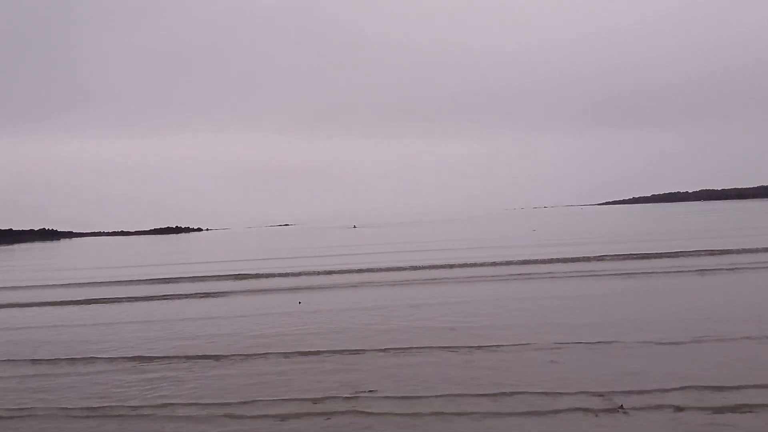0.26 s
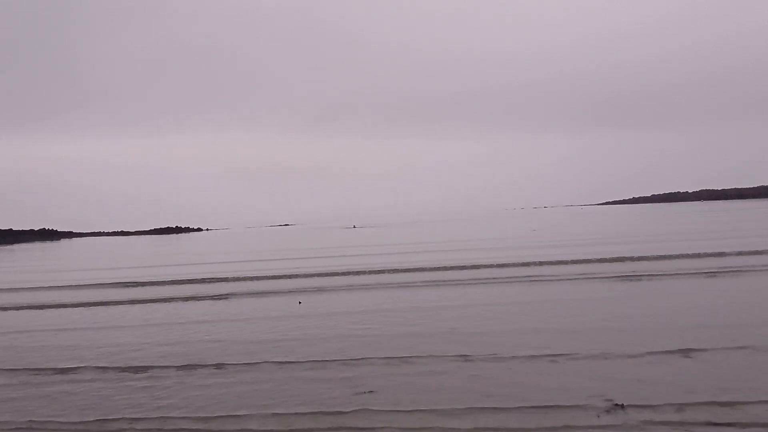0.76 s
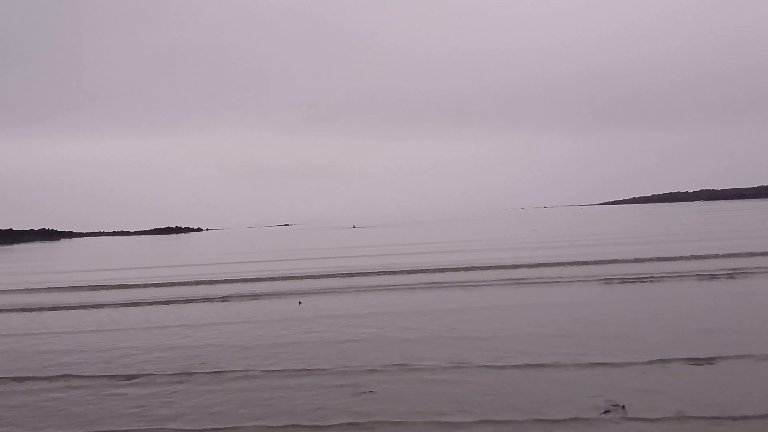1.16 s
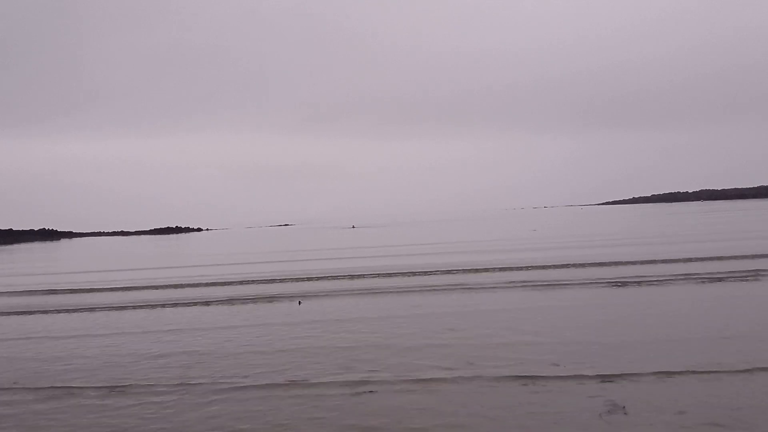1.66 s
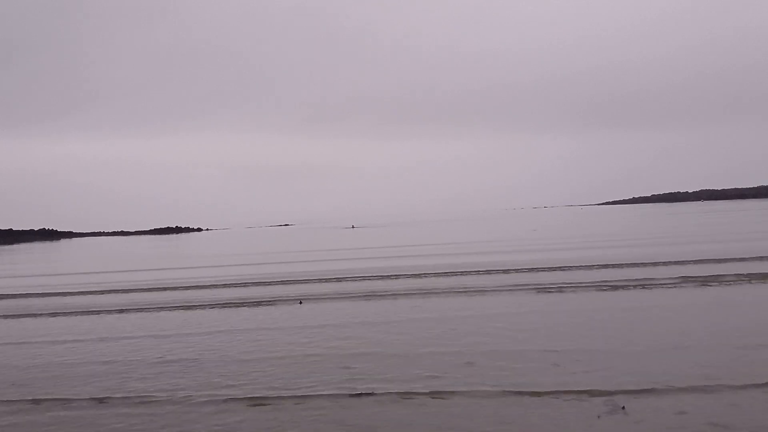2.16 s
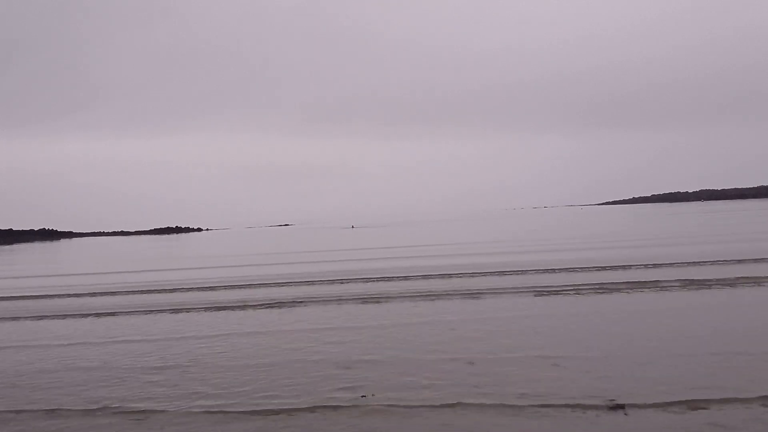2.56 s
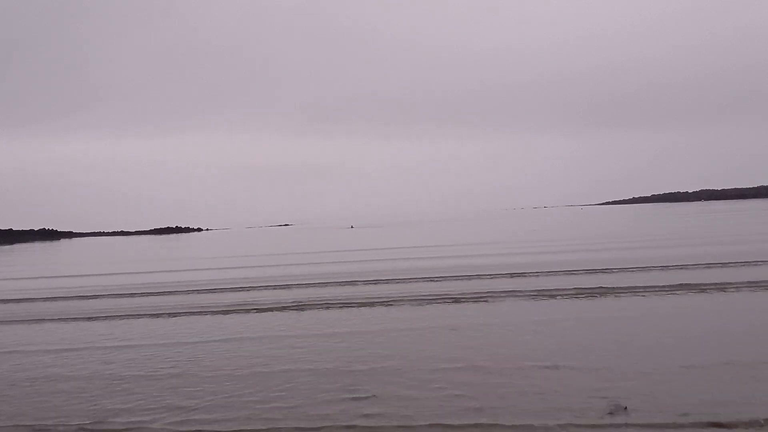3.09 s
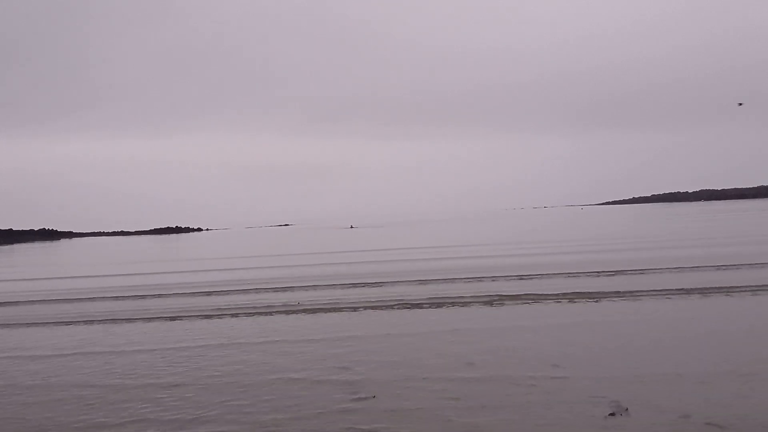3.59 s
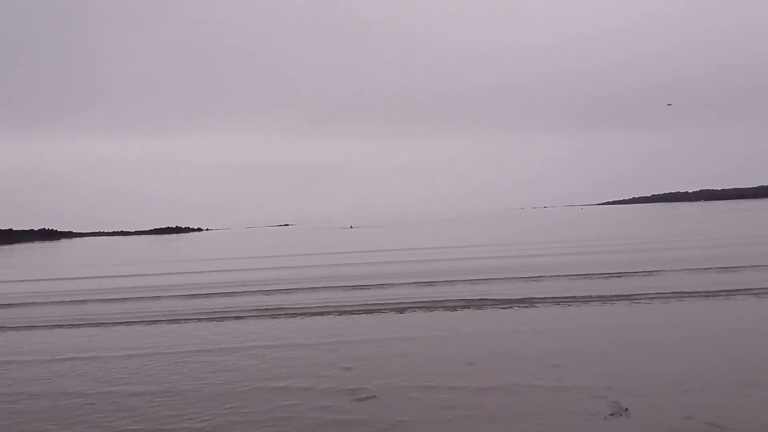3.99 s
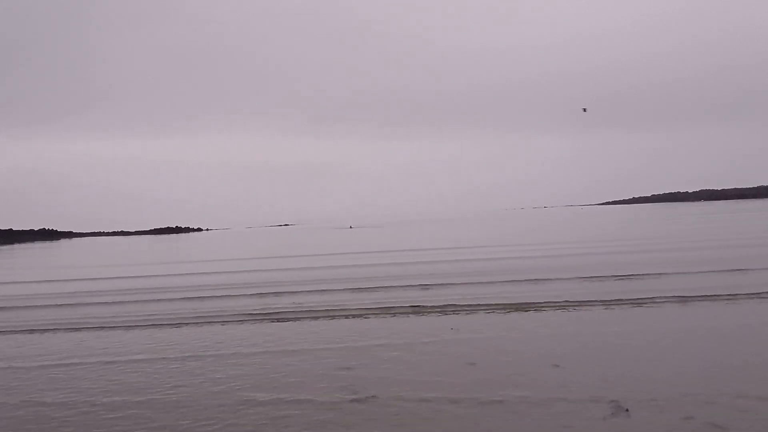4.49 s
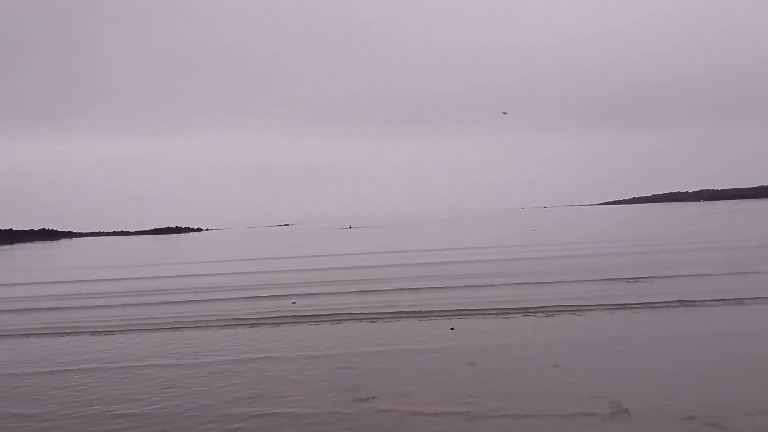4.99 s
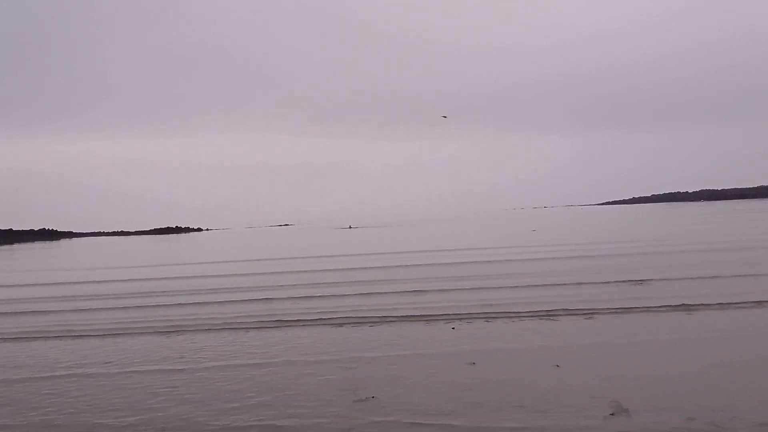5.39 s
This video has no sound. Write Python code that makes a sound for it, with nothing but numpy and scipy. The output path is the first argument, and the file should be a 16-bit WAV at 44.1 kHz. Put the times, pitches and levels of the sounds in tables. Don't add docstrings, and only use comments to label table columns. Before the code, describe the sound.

Close, fizzing shore wash fades into trickles and tiny bubble pops, over a low far-off traffic rumble and a few short bird chirps.

```python
import sys
import numpy as np
from scipy import signal
from scipy.io import wavfile
from scipy.ndimage import uniform_filter1d

SR = 44100
rng = np.random.default_rng(int(sys.argv[2]) if len(sys.argv) > 2 else 0)


def to_wav(s):
    ch = np.atleast_2d(s).T
    pcm = np.round(np.clip(ch, -1, 1) * 32767)
    wavfile.write(sys.argv[1], SR, pcm.astype(np.int16))


def invert_db(x):
    u = np.asarray(x, float) / 20
    return 10 ** u


N = 249165
T = np.arange(N) / SR
SPACING_M, SOUND_SPEED = 0.18, 343


def evened(x):
    return x / np.sqrt(np.mean(x ** 2) + 1e-20)


def read(points, hz):
    f, value = np.transpose(points)
    return np.interp(np.log(hz + 1), np.log(f + 1), value)


def curves(rows, t):
    s, *columns = np.transpose(rows)
    return [np.interp(t, s, c) for c in columns]


def follow(control_db, base_db, share):
    return invert_db(base_db + share * control_db)


def drift(t, lo_hz, hi_hz):
    total = np.zeros(len(t))
    for f in np.geomspace(lo_hz, hi_hz, num=24):
        total += np.sin(2 * np.pi * (f * t + rng.random())) / np.sqrt(f)
    return evened(total)


def add(mix, s, sound, pan_db, lag=0):
    for ear, side, late in ((0, 0.31, max(lag, 0)), (1, -0.87, max(-lag, 0))):
        part = mix[ear, round(s * SR) + late:][:len(sound)]
        part += invert_db(side * pan_db) * sound[:len(part)]


# f/Hz, left minus right level/dB
EAR_BALANCE = [(60, -1.5), (120, -1.5), (240, -3.5), (480, -3.0), (950, -2.5), (1890, -2.5), (3770, -3.5),
               (7520, -2.5), (15000, -2.5)]


def hiss(colour, size, patchy_db, flicker_db, tilt=0, spread=1):
    hop, hz = size // 4, np.fft.rfftfreq(size, 1 / SR)
    frames = N // hop + 5
    a, b, c, d, patches, flicker = rng.standard_normal((frames, len(hz), 6)).T
    patches = uniform_filter1d(patches, size=size // 100 + 1, axis=0)
    patches = evened(uniform_filter1d(patches, size=2048 // hop + 1, axis=1))
    flicker = evened(uniform_filter1d(flicker, size=size // 8, axis=0))
    same = np.sinc(2 * hz * SPACING_M * spread / SOUND_SPEED)[:, None] * .97
    left = a + 1j * b
    right = same * left + np.sqrt(1 - same ** 2) * (c + 1j * d)
    tilt_db = np.interp(np.arange(frames) * hop, np.arange(N), tilt * np.ones(N))
    slope = np.log2((hz[:, None] + 50) / 1500) * tilt_db
    balance = read(EAR_BALANCE, hz)[:, None] * np.array([.5, -.5])[:, None, None]
    level = read(colour, hz)[:, None] + slope + patchy_db * patches + flicker_db * flicker + balance
    z = np.array([left, right]) * invert_db(level)
    return evened(signal.istft(z, nperseg=size, noverlap=size - hop)[1][:, :N])


def bubble(hz, ring_s, rise, onset=0.086):
    u = np.arange(round(2.1 * ring_s * SR) + 8) / (ring_s * SR)
    tone = np.sin(2 * np.pi * hz * ring_s * (u + rise * u ** 2 / 2))
    return tone * invert_db(-40 * u) * np.minimum(u / onset, 1)


def swarm(lo_hz, hi_hz, cycles, per_s, spread_db, count, wide=1):
    out = np.zeros((2, N))
    for hz, shape, way in zip(np.geomspace(lo_hz, hi_hz, num=count), *rng.random((2, count))):
        strength = invert_db(spread_db * np.minimum(rng.exponential(1, N), 4))
        train = strength * (rng.random(N) < per_s / count / SR)
        ring = bubble(hz, cycles * (0.52 + 1.39 * shape) / hz, .5 * shape)
        lag = round((1 - 2 * wide * way) * SPACING_M / SOUND_SPEED * SR)
        add(out, 0, signal.oaconvolve(train, ring)[:N], -3, lag)
    return evened(out)


# f/Hz, level/dB per Hz
WASH_COLOUR = [(290, -57), (500, -20.5), (652, -10.5), (1110, -3.5), (1500, -2), (2440, -7.5), (3460, -5.5),
               (5160, -14), (6490, -17), (7510, -17), (9000, -38), (11700, -20), (19800, -120)]


def wash(wave_db):
    water = hiss(WASH_COLOUR, size=512, patchy_db=1.45, flicker_db=-0.1, tilt=-2.15)
    bubbles = swarm(1405, 5190, 10.8, 900., 2.3, count=20, wide=0.44)
    return follow(wave_db, -51.5, 1.123) * (water + 0.45 * bubbles)


# f/Hz, level/dB per Hz
FOAM_COLOUR = [(2940, -7.5), (5000, -1.5), (6490, -7.5), (7510, 1), (8230, -1.5), (15100, -1), (15900, -24)]


def foam(wave_db):
    fizz = hiss(FOAM_COLOUR, size=256, patchy_db=1.0, flicker_db=2.5)
    bubbles = swarm(5700, 13800, 1.8, 600., 3.5, count=16, wide=.45)
    return follow(wave_db, -61, 1.3) * (fizz + 0.63 * bubbles)


def plunge(wave_db):
    return follow(wave_db, -56.5, 2.6) * swarm(578, 1020, 10.1, 1100., 0.76, count=14, wide=0.38)


# t/s, peak level/dB
SPURTS = [(.01, -51.5), (.14, -51.5), (.28, -52), (.43, -53), (.48, -56), (.57, -55), (1.98, -60),
          (2.28, -83), (2.985, -57), (3.29, -59), (3.81, -66), (3.96, -62), (4.07, -72), (4.33, -67),
          (4.41, -66), (4.59, -85), (4.97, -63), (5.04, -68)]


def trickle(wave_db):
    rise_s, fall_s = 0.0087, 0.019
    gain = follow(wave_db, -56.5, 3.5)
    gain += invert_db(-70.5) * np.exp(-((T - 4.34) / 0.78) ** 2)
    for s, db in SPURTS:
        gain += invert_db(db) * np.exp(-abs(T - s) / np.where(T < s, rise_s, fall_s))
    return gain * swarm(968, 2118, 15., 600., 1.3, count=20, wide=0.4)


# t/s, level/dB below its crest
WAVE_STRENGTH = [(0, -2), (.3, -1), (.55, 0), (1.0, -0.5), (1.35, -2), (1.6, -2.5), (1.8, -3.5),
                 (2.05, -3.5), (2.7, -6), (3.15, -9), (3.7, -12), (4.1, -12.5), (4.5, -13.5), (5.0, -15),
                 (5.25, -18), (5.65, -18.5)]


def wave():
    wave_db = curves(WAVE_STRENGTH, T)[0]
    return wash(wave_db) + foam(wave_db) + plunge(wave_db) + trickle(wave_db)


# t/s, peak level/dB, f/Hz, left minus right level/dB
SLAPS = [(0.002, -41, 1350, -5), (0.141, -35, 1520, -2.5), (0.279, -40, 1540, 1), (0.424, -46, 630, -2.5),
         (0.526, -40, 964, -0.5), (0.569, -36.5, 1370, -4), (0.708, -41, 1540, -3.5), (1.243, -49, 903, 0),
         (1.773, -51, 1362, -10), (2.023, -46, 958, -3.0), (2.573, -52, 1339, -6)]


def slaps():
    out = np.zeros((2, N))
    for s, db, hz, pan_db in SLAPS:
        for pitch in (0.56, 0.95, 1.395):
            add(out, s, invert_db(db - 8.0) * bubble(hz * pitch, .012, 0.097), pan_db, lag=18)
    return out


# t/s, peak level/dB, f/Hz, left minus right level/dB
BUBBLES = [(0.349, -47, 1220, 0), (0.489, -50, 730, -4.5), (2.268, -48.5, 1630, -3.5),
           (2.739, -54, 2027, -7), (2.955, -55, 1490, -5), (2.989, -49.5, 1430, -3), (3.139, -55, 779, -5),
           (3.03, -57, 1410, 0), (3.32, -51.5, 1570, -3), (3.725, -59, 2110, -6), (4.812, -61, 1480, -4),
           (3.49, -59, 1890, -4), (3.685, -59, 2450, -4), (5.158, -62, 1700, -4), (3.378, -57, 1910, -4),
           (3.412, -63, 1440, -3.5), (3.58, -67, 1310, -3.5), (3.69, -59, 1174, -3), (3.782, -55, 1200, -1),
           (3.8645, -65, 1700, -4), (4.6, -59, 1880, -4), (.425, -52, 1150, -2.5), (.444, -43, 1307, -2.5),
           (.478, -48, 1410, -2.5), (.59, -47, 1500, -2.5), (.36, -46, 1500, -2.5), (.95, -48, 835, -2.5),
           (1.01, -47, 822.5, -1), (1.02, -47, 1600, -2.5), (1.435, -49, 1325, -7), (1.46, -48, 1324, -3),
           (1.51, -48.5, 885, -3), (4.042, -52.5, 1440, 1), (4.119, -60, 2000, -6), (4.29, -50.5, 1505, -1),
           (4.834, -57, 1630, -4.5), (5.229, -62, 1410, -4), (5.629, -65, 1640, -11)]


def large_bubbles():
    out = np.zeros((2, N))
    for s, db, hz, pan_db in BUBBLES:
        ring_s = 0.045 * min((hz / 1400) ** -0.62, 1.1)
        add(out, s, invert_db(db - 2) * bubble(hz * .97, ring_s, 0.085), pan_db, lag=5)
    return out


# t/s, level/dB, from f/Hz, to f/Hz, length t/s
GURGLES = [(3.111, -54, 1274, 967, 0.019), (3.275, -56, 1600, 1400, 0.025), (2.9, -54, 1230, 1800, 0.022),
           (3.154, -54, 800, 960, 0.014), (4.7, -59, 1450, 1670, 0.016), (4.386, -64, 820, 810, 0.035),
           (4.44, -66, 1480, 1800, 0.012), (4, -71, 1140, 1290, 0.0091), (3.4, -63, 1240, 1130, 0.017),
           (3.93, -59, 1470, 1350, .03), (4.3247, -50, 2060, 1930, .01), (4.397, -51.5, 1400, 1150, 0.018),
           (4.3972, -53, 1700, 1500, 0.006), (4.422, -52, 1620, 1450, 0.009),
           (4.425, -53, 1000, 1450, 0.022), (4.316, -57, 1000, 1250, 0.018),
           (4.486, -57, 1200, 1230, 0.014), (4.519, -57.5, 1080, 1500, 0.026),
           (3.996, -56, 1500, 1420, .014), (4.585, -63, 1240, 1220, .014), (5.02, -59.5, 1600, 1500, .02),
           (4.947, -61, 570, 580, .02), (4.455, -59, 1400, 1700, .01), (4.3, -59, 1650, 1500, .012),
           (4.335, -60, 1800, 1900, .012), (4.19, -60, 1350, 1500, .014), (3.8, -69, 1200, 1200, 0.059),
           (3.7, -62, 1550, 1300, .025), (5.4, -60, 1300, 1500, 0.0072), (4.435, -63, 890, 880, 0.017),
           (4.164, -64, 1690, 1500, 0.013), (3.6, -65, 1310, 1480, .012), (4.1, -61, 1100, 1070, 0.018),
           (4.53, -54.5, 2930, 2620, 0.007), (3.6, -65, 1600, 1300, 0.012), (4.809, -59.5, 616, 680, .028)]


def gurgles():
    out = np.zeros((2, N))
    for s, db, from_hz, to_hz, length in GURGLES:
        u = np.linspace(0, 1, round(length * SR))
        tone = np.sin(2 * np.pi * np.cumsum(from_hz + (to_hz - from_hz) * u) / SR)
        tone *= 1 + .22 * evened(uniform_filter1d(rng.standard_normal(len(u)), size=90))
        envelope = np.interp(u, [0, .08, .6, 1], [0, 0.38, 0.3, 0.08])
        add(out, s, np.sqrt(2) * invert_db(db) * tone * envelope, -3, lag=4)
    return out


# t/s, peak level/dB, f/Hz, left minus right level/dB
TICKS = [(.131, -58, 4720, 3), (.279, -45, 4730, -2.5), (.328, -46, 4500, -3), (.533, -47, 5470, -3),
         (.709, -53, 4630, -7), (.764, -44, 4990, -6), (.807, -44, 6500, -3), (1.005, -50, 5040, -3.5),
         (1.313, -53, 5000, -7), (1.938, -48, 7400, -8), (2.061, -46, 4800, -1.5), (2.337, -49, 4535, -6),
         (2.6796, -51, 6368, -7), (2.838, -44.5, 3785, -3), (2.944, -45, 3812, -3), (2.957, -49, 3980, -10),
         (3.051, -55, 5670, -5), (3.9005, -56, 5600, -5), (4.11, -55, 3600, -6), (4.325, -50.5, 7400, -6),
         (4.3248, -56, 3900, -7), (4.3249, -59, 5600, -5), (4.38, -57, 4120, -7), (4.503, -60, 8500, -8),
         (4.655, -59, 4270, -14), (4.893, -59, 4620, -6), (4.977, -56.5, 4970, -2.5),
         (5.004, -60, 4360, -3), (5.21, -65, 6600, -11)]


def foam_ticks():
    out = np.zeros((2, N))
    for s, db, hz, pan_db in TICKS:
        add(out, s, invert_db(db + 1.5) * bubble(hz, .003, .1), pan_db, lag=2)
        add(out, s, invert_db(db - 2.5) * bubble(1.5 * hz, .001, .1), pan_db, lag=2)
    return out


# t/s, peak level/dB, f/Hz, left minus right level/dB
PRICKS = [(0.0203, -55, 13700, -1.5), (0.0661, -52, 13000, -1.0), (0.2452, -54, 11500, -1.0),
          (1.0039, -45, 12100, -3.0), (1.5129, -53, 9270, -2.0), (2.0819, -45, 13000, -2.5),
          (2.6584, -54, 10500, -2.0), (2.6902, -50, 9880, -1.0), (2.7564, -53, 11300, -2.5),
          (2.9531, -51, 15000, -2.5), (2.972, -47, 11500, -1.5), (3.0936, -56, 11400, -1.0),
          (3.4899, -58, 14300, -2.0), (4.3239, -57, 8130, -2.5), (4.3454, -63, 11900, -2.5),
          (4.3774, -60, 14700, -1.5)]


def foam_pricks():
    out = np.zeros((2, N))
    for s, db, hz, pan_db in PRICKS:
        add(out, s, invert_db(db + 5.0) * bubble(hz, 0.0013, .1), pan_db, lag=18)
    return out


# t/s, peak level/dB, left minus right level/dB
KNOCKS = [
    (3.8069, -36.5, 21),
    (5.4515, -56, 10),
]


def knocks():
    out = np.zeros((2, N))
    ms = np.arange(300) / SR * 1000 - 2
    push = -np.exp(-(ms / .21) ** 2) * (1 - .2 * np.cos(2 * np.pi * 4.0 * ms))
    push += .15 * np.exp(-((abs(ms) - .65) / .22) ** 2)
    push -= .26 * np.exp(-((ms - 1.45) / .3) ** 2)
    for s, db, pan_db in KNOCKS:
        add(out, s, invert_db(db) * push, pan_db)
    return out


# t/s, length t/s, top f/Hz, level/dB, octave level/dB
BIRDS = [
    (0.297, 0.046, 2650, -61, -14),
    (0.552, 0.05, 2620, -58.5, -14),
    (1.254, 0.034, 2680, -64, -16),
    (2.624, 0.041, 2590, -56, -19),
    (3.09, 0.04, 2506, -58, -17),
    (3.709, 0.0355, 2160, -68.5, -23),
    (3.971, 0.041, 2620, -61, -10),
    (4.926, 0.062, 1880, -64, -9),
]


def birds():
    out = np.zeros((2, N))
    for s, length, hz, db, octave_db in BIRDS:
        lead = .55 * (hz > 2000)
        u = np.linspace(0, 1, round(length * SR))
        start, step = (.74, .83) if lead else (.97, .97)
        pitch = np.interp(u, [0, .2, .28, .55, .8, 1], [start, step, .97, 1, .965, .86])
        turns = np.cumsum(hz * pitch) / SR
        envelope = np.interp(u, [0, .06, .21, .27, .45, .85, 1], [0, lead, lead, .9, 1, .7, 0])
        breath = np.sqrt(2) * invert_db(db) * envelope
        overtones = np.sin(4 * np.pi * turns) + invert_db(-17) * np.sin(6 * np.pi * turns)
        add(out, s, breath * np.sin(2 * np.pi * turns), -2.5, lag=20)
        add(out, s, breath * np.minimum(u / 0.16, 1) * invert_db(octave_db) * overtones, -8.5, lag=20)
    return out


def engine(rows, orders, parts, waver_db, swells=()):
    t = np.arange(0, N / SR + .02, .01)
    hz, load_db = curves(rows, T)
    turns, out = np.cumsum(hz) / SR / parts, np.zeros(N)
    for k, db in orders.items():
        air_db = waver_db * drift(t, 0.84, 4.0)
        for order, s, gain_db in swells:
            if round(order) == k:
                air_db += gain_db * np.exp(-((t - s) * k / 0.85) ** 2)
        out += invert_db(db + np.interp(T, t, air_db)) * np.sin(2 * np.pi * (k * turns + rng.random()))
    return np.sqrt(2) * invert_db(load_db) * out


# t/s, firing f/Hz, load level/dB
BIG_ENGINE = [(0, 72.5, -70), (.65, 76.94, -69), (.9, 78.46, -47), (1.35, 81.7, -47.5), (1.65, 84.8, -43),
              (1.9, 87.1, -44), (2.07, 88.6, -40), (2.25, 90.3, -43), (2.5, 92.46, -41.5),
              (2.8, 94.16, -42.5), (2.9, 93.2, -51.5), (3.05, 92.96, -51), (3.2, 94, -94)]
BIG_ORDERS = {4: -17.5, 5: -38, 6: -25, 8: 0, 9: -17.5, 10: -25, 11: -44, 12: -52, 13: -36.5, 14: -32.5, 15:
              -28.5, 16: -29, 18: -40, 19: -29.5, 21: -28, 28: -35, 31: -35.5, 41: -38.5}
# t/s, firing f/Hz, load level/dB
SMALL_ENGINE = [
    (0, 61.3, -64),
    (.4, 64, -57),
    (1, 68.1, -52.5),
    (1.9, 75.1, -50.5),
    (2.75, 81.2, -55.5),
    (3, 77, -51),
    (3.4, 65.5, -54),
    (3.6, 62, -62),
    (3.8, 58, -90),
]
SMALL_ORDERS = {4: -12, 6: 0, 12: -26}
# t/s, strongest line f/Hz, load level/dB
DRONE = [
    (0, 90, -110),
    (2.2, 95, -85),
    (2.5, 95.5, -68),
    (3.6, 98.5, -68),
    (4, 102, -68),
    (4.6, 106.6, -68),
    (5.25, 109.3, -68),
    (5.33, 109.7, -86),
    (5.41, 110, -68),
    (5.65, 111, -68),
]
DRONE_ORDERS = {3: -6, 5: 0, 6: 0, 7: -3, 8: -5, 9: 0, 12: -7}
# order in ninths, t/s, gain level/dB
SWELLS = [(5, 2.8, 13), (5, 3.4, 9), (5, 4.25, 11), (5, 5.05, 8), (9, 3.3, 5), (9, 4, 12), (9, 4.5, 9),
          (9, 5.5, 7), (6, 3.72, 7), (6, 4.52, 14), (6, 5.21, 14), (6, 5.5, 12), (7, 4.9, 13),
          (8, 4.65, 8)]


def engines():
    lines = engine(BIG_ENGINE, BIG_ORDERS, parts=8, waver_db=.5)
    lines += engine(SMALL_ENGINE, SMALL_ORDERS, parts=6, waver_db=.5)
    lines += engine(DRONE, DRONE_ORDERS, parts=9, waver_db=1.2, swells=SWELLS)
    out = np.zeros((2, N))
    add(out, 0, lines, -1.4, lag=-15)
    return out


def intake_whistle():
    colour = [(6800, -50), (7250, -4), (7450, 0), (7650, -4), (8100, -50)]  # f/Hz, level/dB per Hz
    load_db = curves(BIG_ENGINE, T)[1]
    return invert_db(np.minimum(load_db, -48) - 30.5) * hiss(colour, size=512, patchy_db=1.2, flicker_db=.8)


# f/Hz, level/dB per Hz
ROAR_COLOUR = [(12, -52), (20, -29), (32, -30), (46, -34), (65, 2.5), (113, 0.5), (123, -14.5),
               (134, -10.5), (150, -22), (200, -46), (330, -120)]


def road_roar(effort_db):
    coarse = T[::441]
    gusts_db = 2.5 * np.interp(T, coarse, drift(coarse, 2.5, 7.5))
    roar = hiss(ROAR_COLOUR, size=4096, patchy_db=-2.0, flicker_db=-1.0, spread=3.55)
    return follow(effort_db, -55.5, 0.54) * invert_db(gusts_db) * roar


# f/Hz, level/dB per Hz
RASP_COLOUR = [(76, -29), (130, -3.5), (157, -8.5), (231, -5), (355, -12.5), (398, -18), (471, -14),
               (520, -14.5), (680, -28), (1140, -120)]


def exhaust_rasp(effort_db):
    rasp = hiss(RASP_COLOUR, size=2048, patchy_db=0.9, flicker_db=1.1, spread=1.82)
    return follow(effort_db, -64.5, 0.73) * rasp


# t/s, effort level/dB
EFFORT = [(0, -7), (.55, 0.5), (1.3, -2), (1.9, 0), (2.35, 5.5), (2.8, 5), (3.05, -2), (3.6, -6), (4.8, -5),
          (5.2, -6.5), (5.33, -7), (5.46, -2), (5.65, -6)]


def traffic():
    effort_db = curves(EFFORT, T)[0]
    return engines() + intake_whistle() + road_roar(effort_db) + exhaust_rasp(effort_db)


# f/Hz, level/dB per Hz
CALM_COLOUR = [(250, -42), (420, -17), (683, -4), (737, -11), (1600, -0.5), (1750, -10), (2170, -20),
               (2680, -12), (2810, -6), (3270, -19), (8520, -28.5), (11400, -10.5), (15900, -11.5)]


def calm():
    return invert_db(-68) * hiss(CALM_COLOUR, size=1024, patchy_db=1.0, flicker_db=-0.5)


def scene():
    water = wave() + slaps() + large_bubbles() + gurgles() + foam_ticks() + foam_pricks()
    return water + knocks() + birds() + traffic() + calm()


def top_cut(x):
    return signal.sosfilt(signal.butter(12, 15795, fs=SR, output="sos"), x)


def record(dry):
    lowpass = signal.firwin(1023, 15900, window=("kaiser", 9), fs=SR)
    limited = signal.oaconvolve(dry, lowpass[None], "same")
    return top_cut(limited)


dry = scene()
out = record(dry)
to_wav(out)
```